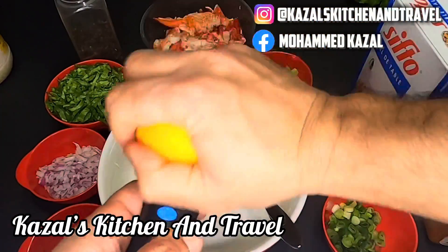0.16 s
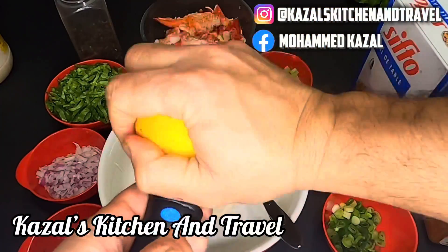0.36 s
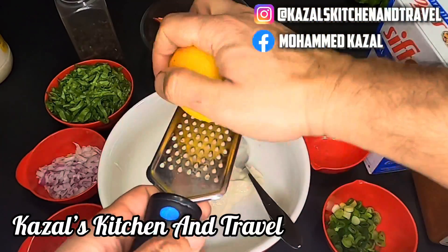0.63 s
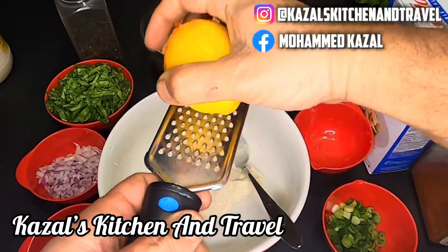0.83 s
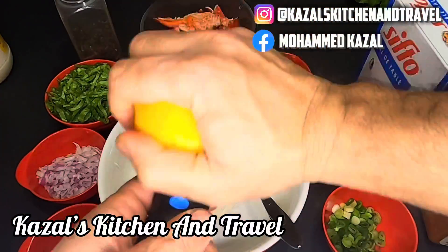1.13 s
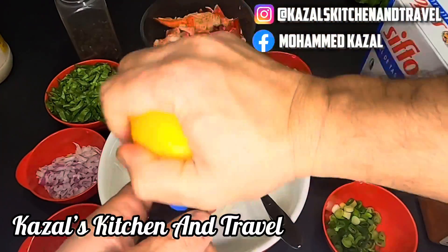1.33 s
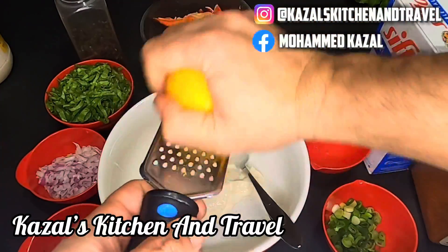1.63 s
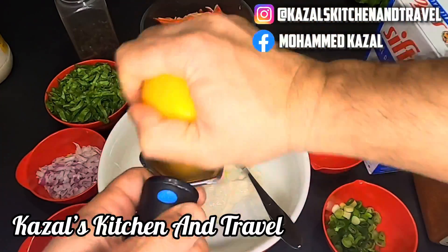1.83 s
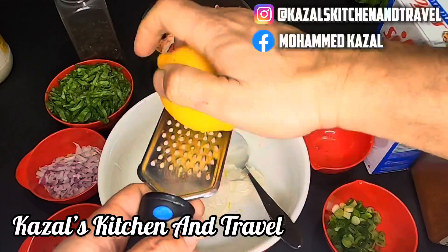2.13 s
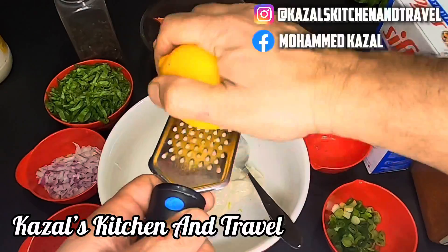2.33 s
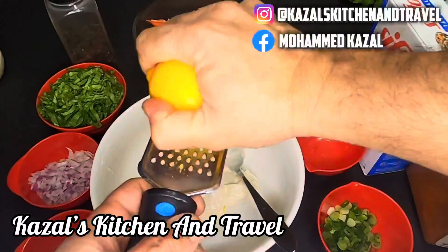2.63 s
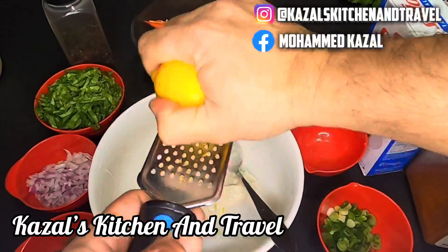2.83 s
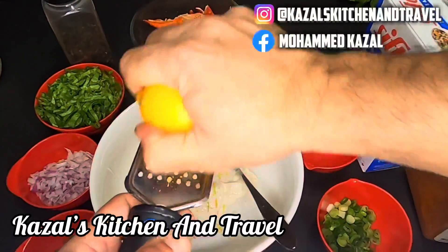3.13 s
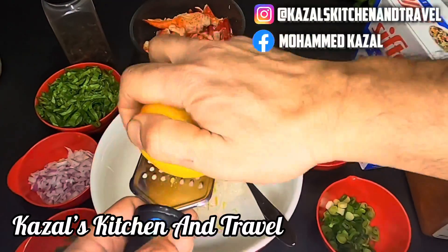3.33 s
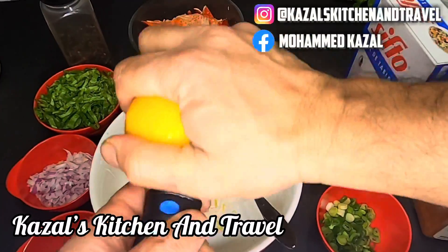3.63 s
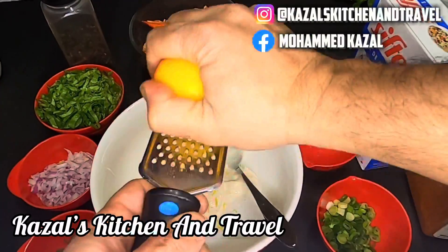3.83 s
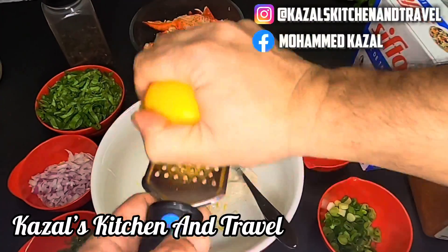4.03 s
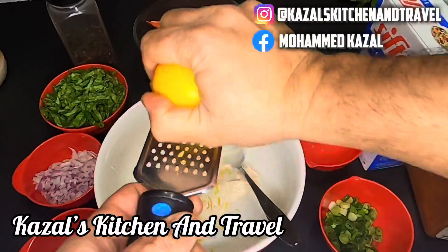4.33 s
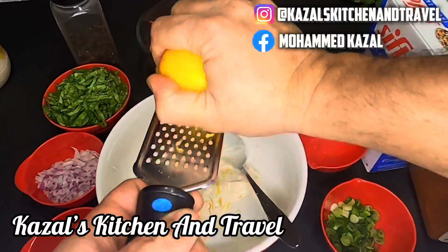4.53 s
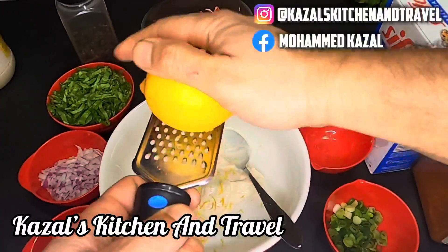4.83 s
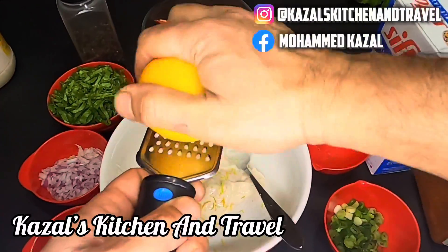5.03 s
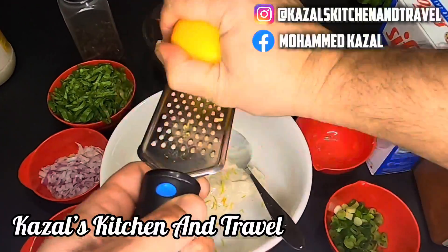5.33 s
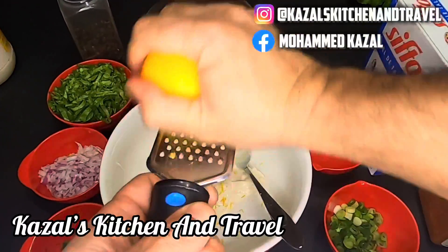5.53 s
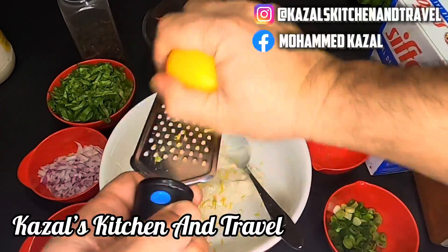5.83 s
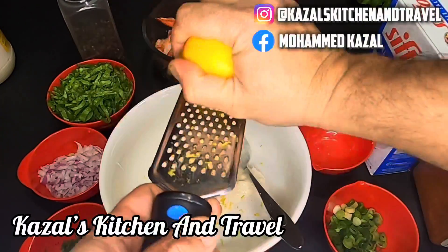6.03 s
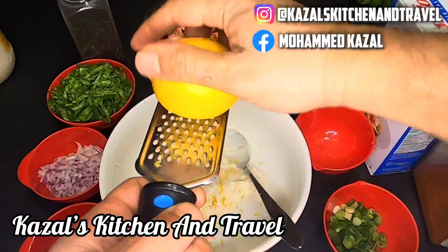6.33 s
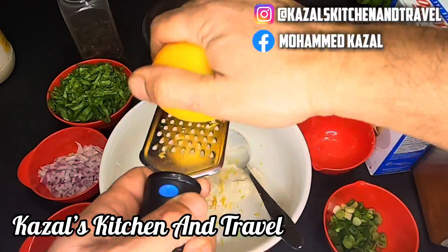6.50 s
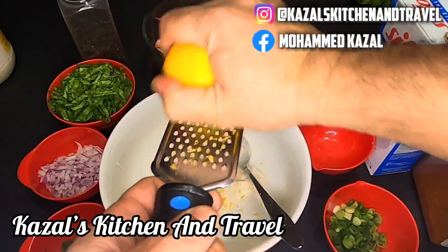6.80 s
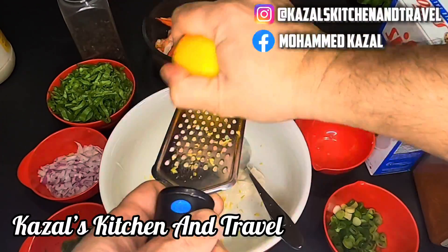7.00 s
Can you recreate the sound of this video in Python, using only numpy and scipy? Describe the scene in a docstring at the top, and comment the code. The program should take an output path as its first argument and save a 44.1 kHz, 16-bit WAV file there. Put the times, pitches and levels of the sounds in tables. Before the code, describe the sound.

Close stereo microphone in a small kitchen with only a faint echo. A lemon is pushed along a handheld steel grater in bursts of two to four crisp, gritty rasps, with much fainter pull-back scrapes between them. Small metallic ticks snag here and there. Between bursts the fruit is turned with barely audible brushes, and a constant low appliance hum and soft rumble remain.

```python
"""A lemon is pushed down and drawn back over the teeth of a steel hand grater, in bursts of two to four pushes.
Each tooth catches the rind and lets go with a click that rings the damped plate. Single teeth snag and tick,
the rind slides off after a burst, and brief brushes come while the fruit is turned. A kitchen appliance hums
and rumbles behind as steady tones over shaped noise. The room echoes faintly; a two-port microphone is close by."""
import sys
import numpy as np
from scipy import signal
from scipy.fft import rfft, irfft, next_fast_len
from scipy.io import wavfile

SR = 44100
rng = np.random.default_rng(int(sys.argv[2]) if len(sys.argv) > 2 else 0)


def bounce(signal):
    """Save signal as a 16-bit WAV file at the path given by the first command-line argument."""
    frames = np.transpose(np.atleast_2d(signal))
    limited = np.clip(frames, -1, 1)
    pcm = np.round(limited * 32767).astype(np.int16)
    wavfile.write(sys.argv[1], SR, pcm)


N = 315756

# steady tones of the appliance: f/Hz, level/dB (rms, before the ports and slow drift)
HUM_TONES = [(59.0, -38.5), (86.1, -52), (146, -58), (189, -56.5), (369, -61), (415.5, -57), (466, -64.5),
             (516, -67), (565, -74)]
# resonant rumble of the appliance: f/Hz, relative level/dB (per Hz)
RUMBLE_SPECTRUM = [(13, -22), (24, -3.5), (40, -7.5), (76, -15), (91, -5), (110, -10), (172, -8.5),
                   (212, -11.5), (250, -6.5), (340, -13.5), (410, -11.5), (520, -18.5), (700, -29),
                   (850, -31.5)]
# its air noise above the rumble, on the same scale: f/Hz, relative level/dB (per Hz)
AIR_SPECTRUM = [(1100, -30.5), (1500, -33), (2200, -45.5), (4000, -56.5), (7000, -52), (8500, -59.5),
                (12000, -74), (15000, -101)]
# how the microphone ports differ: f/Hz, left minus right level/dB, left ahead of right phase/rad
PORT_DIFFERENCE = [(60, 2.3, -.17), (374, 1.2, -0.4), (1300, 1.5, -.4), (2400, 2.7, -.5), (4400, 5, -.9),
                   (6340, 4, -1.5), (7360, 10, -2.0), (8100, 0, -3.14), (8740, -9, -1.5),
                   (8930, -5.5, -1.1), (15100, -5.5, -2)]
# gain of the scattered sound, which the ports hear in opposite sign: f/Hz, level/dB
PORT_SCATTER = [(60, -24), (200, -19), (600, -15), (1400, -15), (3000, -14.5), (7000, -5), (8100, -13.5),
                (9000, -5), (15000, -4)]
# what the plate gives back for one catch: f/Hz, relative level/dB (per Hz)
PLATE_SPECTRUM = [(550, -13), (700, -20), (860, -29), (980, -16.5), (1280, -22), (1500, 1), (2400, -6),
                  (3050, -1.5), (3700, -5.5), (4300, -3.5), (6000, -8.5), (8150, -19.5), (12200, -32),
                  (15000, -48)]
# single teeth that snag and let go: t/s, rough peak level/dB, favoured pitch f/Hz
TOOTH_SNAGS = [(0.119, -38, 2600), (0.1527, -38, 3300), (0.194, -17, 2820), (0.9274, -60, 2420),
               (0.942, -51, 2370), (1.135, -50, 2900), (1.2481, -53, 2860), (1.3635, -29, 3000),
               (1.7474, -32, 2970), (1.7613, -45, 2370), (1.981, -23, 3110), (1.9999, -19, 3080),
               (2.0754, -25, 3120), (2.466, -41.5, 2200), (2.6764, -41, 3020), (2.7195, -37, 3000),
               (3.3217, -38, 4740), (3.5343, -43.5, 3750), (3.8578, -42, 3220), (3.936, -43, 3280),
               (4.4141, -25, 3360), (5.0802, -54, 3360), (5.1277, -46.5, 3100), (5.312, -54.5, 2310),
               (5.5775, -26, 4030), (6.2834, -37, 2550), (6.497, -56, 9000), (6.6104, -52, 2460)]
# pushes against the teeth: full bite t/s, held t/s, rasp level/dB, swell while held level/dB,
# rise over 30 dB t/ms, stop over 30 dB t/ms, favoured pitch f/Hz, brightness/(dB per octave)
PUSH_STROKES = [(0.154, 0.049, -42, 12.5, 12, 46, 2730, 0), (0.379, 0.039, -32.5, 6.5, 23, 45, 2760, -.5),
                (0.603, 0.036, -30.5, -1.5, 30, 49, 2730, 0), (1.348, 0.045, -38, 7, 30, 48, 2830, 0),
                (1.573, 0.04, -27, -0.4, 29, 52.5, 3160, -0.4),
                (1.787, 0.045, -26, 1.8, 16.5, 46.5, 2880, 0.5),
                (2.002, 0.069, -27.5, -4, 12, 37, 3075, 1.5), (2.745, .045, -33, 3, 39, 40, 3140, -1.2),
                (2.971, 0.047, -27, -3, 21, 33.5, 3100, 0.5), (3.182, 0.039, -27.5, 2.5, 23, 44, 2980, 0.8),
                (3.955, 0.054, -35, 2, 45, 44, 2860, -2), (4.188, 0.036, -35.5, 7, 25, 33, 2610, -1.5),
                (4.417, 0.051, -26, -1.7, 23, 52, 3280, 0.6), (4.672, 0.039, -28, -3.5, 27, 35, 2750, 0.9),
                (5.445, 0.056, -35, 7, 30, 45, 2700, -0.7), (5.676, 0.06, -37, 11, 24, 38, 2720, -0.3),
                (5.91, 0.048, -30, 6.5, 26, 52, 3000, -0.3), (6.134, 0.059, -28.5, 1.5, 20, 54, 2680, -0.2),
                (6.9, 0.035, -35, 6.5, 54, 42, 3050, -0.7), (7.111, 0.04, -29.5, 0, 27, 62, 3120, -0.8)]
# light pulls back over the teeth: contact t/s, held t/s, rasp level/dB, swell while held level/dB,
# stop over 30 dB t/ms, favoured pitch f/Hz, brightness/(dB per octave)
PULL_STROKES = [(0.05, 0.055, -49.5, 6.5, 46, 2450, -0.3), (0.284, 0.034, -47.5, 3.6, 47, 2250, -0.7),
                (0.479, 0.059, -47, 4, 34, 2500, .3), (1.24, 0.028, -53.5, 1.8, 60, 2600, -2.5),
                (1.456, 0.044, -49.5, 9, 43, 2500, -1), (1.7, 0.029, -43, 3.5, 48.5, 2300, -2.5),
                (1.912, 0.046, -41.5, 7.5, 20, 2600, -1), (2.619, 0.051, -62, 15.5, 32, 2700, -1),
                (2.86, 0.045, -53.5, 4.3, 58, 2150, -0.5), (3.082, 0.056, -45, 5.5, 8, 2200, -2.5),
                (3.826, 0.026, -63.5, 6, 50, 2500, -2), (4.095, 0.031, -52.5, 6.5, 46, 2350, -2),
                (4.338, 0.023, -48, 7.5, 30, 2500, -1.5), (4.56, 0.052, -48.5, 6, 24, 1800, -0.7),
                (5.578, 0.044, -41, 1, 53, 2700, -1), (5.8, 0.051, -47.5, 8.5, 47, 2280, -0.8),
                (6.033, .055, -39.5, 5, 35, 2400, -0.9), (6.758, 0.052, -60, 5.5, 70, 2000, .6),
                (6.99, 0.061, -49.5, 4.5, 41, 2450, 0.3)]
# the rind slides off after the last push of a burst: t/s, held t/s, rasp level/dB, change while held level/dB
RIND_SLIDES = [(0.71, 0.44, -60, -38), (2.11, 0.17, -52.5, -21), (3.275, 0.071, -51.5, 2.5),
               (3.401, 0.067, -68.5, -7), (4.77, 0.2, -58.5, -8), (6.247, 0.082, -48.5, -1),
               (6.38, 0.2, -67.5, -12)]
# brief brushes while the fruit is turned: t/s, rasp level/dB, favoured pitch f/Hz
FRUIT_BRUSHES = [(0.001, -47.5, 2470), (1.134, -64, 1860), (1.19, -72, 1500), (2.468, -54.5, 1600),
                 (3.534, -59, 2290), (4.958, -59, 2295), (5.086, -73, 1680), (5.132, -64.5, 2750),
                 (5.31, -59, 1890), (6.612, -64.5, 1840)]

NOISE_DB = -46   # rumble and air noise together
KITCHEN_T60_S, KITCHEN_DB, WALL_CUT_HZ = 0.22, -24, 12000   # the echo dies faster towards the treble
CUTOFF_HZ = 15700
CATCHES_PER_S, CATCH_SPREAD_DB = 6000, 2   # typical rate, before the catches clump
RING_T60_S = 0.01   # at 3000 Hz; higher modes die sooner
PLATE_CUT_HZ = 910
EVEN_ABOVE_HZ = 4570   # above this, big and small catches sound more and more alike
# pitch changes are in octaves over the hold, brightness changes in dB per octave over the hold
PUSH_PITCH_OCT, PUSH_BRIGHTENS_DB = -0.11, 1.5
PUSH_ARCH_DB = 2.5   # a push is strongest mid-plate
PULL_RISE_MS, PULL_PITCH_OCT, PULL_BRIGHTENS_DB = 65, 0.16, -2.5
SLIDE_EDGE_MS, SLIDE_HZ, SLIDE_PITCH_OCT, SLIDE_BRIGHT_DB = 84, 2700, -0.35, 2
BRUSH_HELD_S, BRUSH_RISE_MS, BRUSH_STOP_MS, BRUSH_BRIGHT_DB = 0.0025, 17, 37, 2.5
EDGE_CURVE = 1.09   # edges steepen towards silence
EDGE_BRIGHTENS_DB = 2.5   # dB per octave: at the edges light contact loses the low modes first
SKIP_S, SKIP_WIDTH_S, SKIP_DB = 4.2165, 0.0046, -22.5   # once the rind jumps a row of teeth


def from_db(db):
    """Turn a level in dB into a gain."""
    return 10 ** (np.asarray(db) / 20)


def rms_one(x):
    """Scale a signal to rms 1."""
    return x / np.sqrt(np.mean(x ** 2) + 1e-20)


def at_hz(points, hz, axis=1):
    """Read a table column between its points on a log-frequency axis."""
    table = np.array(points)
    return np.interp(np.log(np.maximum(hz, 1)), np.log(table[:, 0]), table[:, axis])


def drift(rate_hz):
    """Slow random wandering of spread 1: noise smoothed by two equal low-pass steps."""
    step = 40   # samples between the slow values
    r = np.exp(-2 * np.pi * step * rate_hz / SR)
    noise = rng.standard_normal(N // step + 2002)
    slow = signal.lfilter([1], [1, -2 * r, r * r], noise)[2000:]   # leave out the settling
    return np.interp(np.arange(N) / step, np.arange(len(slow)), rms_one(slow))


def appliance():
    """Steady motor tones over a broad rumble and faint air noise; the noise has a shared and a scattered part."""
    t, hz = np.arange(N) / SR, np.arange(N // 2 + 1) * SR / N
    colour = from_db(at_hz(RUMBLE_SPECTRUM + AIR_SPECTRUM, hz))
    out = rms_one(irfft(rfft(rng.standard_normal((2, N))) * colour, N))
    out = out * from_db(NOISE_DB + .5 * drift(4.7))
    for tone_hz, tone_db in HUM_TONES:
        # pitch and level waver a little
        phase = 2 * np.pi * (tone_hz * t + rng.random()) + 0.0051 * tone_hz * drift(1.61)
        out[0] += np.sqrt(2) * from_db(tone_db + 0.33 * drift(3)) * np.sin(phase)
    return out


def kitchen(x):
    """Sound runs round eight feedback delays for each of two paths, duller on every round."""
    size = next_fast_len(N + SR)
    hz = np.arange(size // 2 + 1) * SR / size
    t60 = KITCHEN_T60_S / np.sqrt(1 + (hz / WALL_CUT_HZ) ** 2)
    answer = np.zeros((2, len(hz)), complex)
    for k, lag in enumerate(rng.uniform(.008, .03, 16)):
        loop = from_db(-60 * lag / t60) * np.exp(-2j * np.pi * hz * lag)
        # the endless rounds of one delay add up to this fraction
        answer[k % 2] += loop / (1 - loop) * (-1) ** (k // 2)
    return irfft(answer * rfft(x, size), size)[:, :N]


def ports(shared, scattered):
    """Two ports hear the shared sound with their own colour and lag, the scattered part in opposite sign."""
    size = next_fast_len(N + 2048)
    hz = np.arange(size // 2 + 1) * SR / size
    half_phase = .5j * at_hz(PORT_DIFFERENCE, hz, axis=2)
    half = from_db(at_hz(PORT_DIFFERENCE, hz) / 2) * np.exp(half_phase)
    mid = rfft(shared, size)
    side = rfft(scattered, size) * from_db(at_hz(PORT_SCATTER, hz))
    return irfft([half * (mid + side), (mid - side) / half], size)[:, :N]


def contact():
    """Every stroke rises, is held and stops; the loudest each millisecond sets level, brightness and pitch."""
    rows = [(s, held, db, swell, rise, stop, hz, PUSH_PITCH_OCT, tilt, PUSH_BRIGHTENS_DB)
            for s, held, db, swell, rise, stop, hz, tilt in PUSH_STROKES]
    rows += [(s, held, db, swell, PULL_RISE_MS, stop, hz, PULL_PITCH_OCT, tilt, PULL_BRIGHTENS_DB)
             for s, held, db, swell, stop, hz, tilt in PULL_STROKES]
    rows += [(s, held, db, change, SLIDE_EDGE_MS, SLIDE_EDGE_MS, SLIDE_HZ, SLIDE_PITCH_OCT, SLIDE_BRIGHT_DB, 0)
             for s, held, db, change in RIND_SLIDES]
    rows += [(s, BRUSH_HELD_S, db, 0, BRUSH_RISE_MS, BRUSH_STOP_MS, hz, 0, BRUSH_BRIGHT_DB, 0)
             for s, db, hz in FRUIT_BRUSHES]
    # one row per stroke, one column per millisecond
    s, held, db, swell, rise, stop, hz, pitch_oct, tilt, brightens = np.array(rows).T[:, :, None]
    t = np.arange(0, N / SR + .002, .001)
    part = np.clip((t - s) / held, 0, 1)   # how far through the hold
    before_s, after_s = np.maximum(s - t, 0), np.maximum(t - s - held, 0)
    edge = 1000 * (before_s / rise + after_s / stop)   # 1 where the level is 30 dB down
    level = db + swell * part - 30 * edge ** EDGE_CURVE
    pushes = len(PUSH_STROKES)
    level[:pushes] += PUSH_ARCH_DB * np.sin(np.pi * part[:pushes])
    level += SKIP_DB * np.exp(-((t - SKIP_S) / SKIP_WIDTH_S) ** 2)
    bright = tilt + brightens * (part - .5) + EDGE_BRIGHTENS_DB * np.minimum(edge, 1)
    favoured_hz = hz * 2 ** (pitch_oct * (part - .5))
    loudest = level.argmax(axis=0), np.arange(len(t))
    return t, level[loudest], bright[loudest], favoured_hz[loudest]


def ring(clicks, hz, t60):
    """A damped mode struck through soft rind: the contact rounds off what lies above its pitch."""
    r, w = from_db(-60 / (t60 * SR)), 2 * np.pi * hz / SR
    soft = np.exp(-w)
    poles = np.convolve([1, -2 * r * np.cos(w), r * r], [1, -soft])
    gain = 1.227 * (1 - soft) * np.sin(w) * np.sqrt(2 - 2 * r * r)
    return signal.lfilter([0, gain], poles, clicks + 1e-18)


def grater():
    """Random catches and single snags strike the plate's modes, each with a strength of its own per catch."""
    s, rasp_db, bright, favoured_hz = contact()
    # catches come in clumps as rows of teeth pass under the rind
    chance = CATCHES_PER_S * from_db(1.2 * drift(60)) / SR
    caught = np.flatnonzero(rng.random(N) < chance)
    level_db, tilt, centre = (np.interp(caught / SR, s, c) for c in (rasp_db, bright, np.log2(favoured_hz)))
    level_db = level_db + 10 * np.log10(SR / CATCHES_PER_S)   # sparse clicks must be stronger
    sizes = rms_one(from_db(CATCH_SPREAD_DB * np.minimum(rng.exponential(1, len(caught)), 4)))
    # each tooth flicks hardest near a pitch of its own, in octaves
    tooth = np.log2(3000) + 1.175 * rng.standard_normal(len(caught))
    snag_s, snag_db, snag_hz = np.transpose(TOOTH_SNAGS)
    snag_at = np.round(snag_s * SR).astype(int)

    modes = np.geomspace(600, 15000, 30)
    weights = from_db(at_hz(PLATE_SPECTRUM, modes)) * np.sqrt(modes)   # higher modes each cover a wider band
    weights = weights / np.sqrt(np.sum(weights ** 2))
    out = np.zeros((2, N))   # shared by both ports, and carried by scattered paths only
    for k, (hz, weight) in enumerate(zip(modes, weights)):
        slope_db = tilt * np.log2(hz / 3000)
        # the spot under the fruit favours modes near one pitch
        spot_db = 5 * np.exp(-((np.log2(hz) - centre) / .35) ** 2)
        # every mode swells and fades as the spot slides
        spot_db = spot_db + 2.5 * drift(20)[caught]
        even = min(1, EVEN_ABOVE_HZ / hz) ** 2
        tooth_db = -25.0 * even * np.minimum(np.abs(np.log2(hz) - tooth), .8)
        makeup_db = 8.42 * even   # offsets the loss away from each tooth's pitch
        strength = weight * sizes ** even * from_db(level_db + slope_db + spot_db + tooth_db + makeup_db)
        clicks = np.zeros((2, N))
        clicks[:, caught] = strength * rng.standard_normal((2, len(caught)))
        # a snag strikes neighbouring modes in opposite sign
        clicks[0, snag_at] += (-1) ** k * from_db(snag_db + 7 - 10 * np.log2(hz / snag_hz) ** 2)
        out += ring(clicks, hz, RING_T60_S * np.sqrt(3000 / hz))
    # a small perforated plate radiates little bass
    return signal.sosfilt(signal.butter(8, PLATE_CUT_HZ, "high", fs=SR, output="sos"), out)


def scene():
    """Grater, its echo from the kitchen and the appliance, all heard through the ports."""
    rasp = grater()
    echo = from_db(KITCHEN_DB) * kitchen(rasp[0])
    shared, scattered = rasp + echo + appliance()
    return ports(shared, scattered)


def record(dry):
    """A steep low-pass filter cuts the top of the treble."""
    return signal.sosfilt(signal.ellip(10, .5, 70, CUTOFF_HZ, fs=SR, output="sos"), dry)


dry = scene()
out = record(dry)
bounce(out)
```